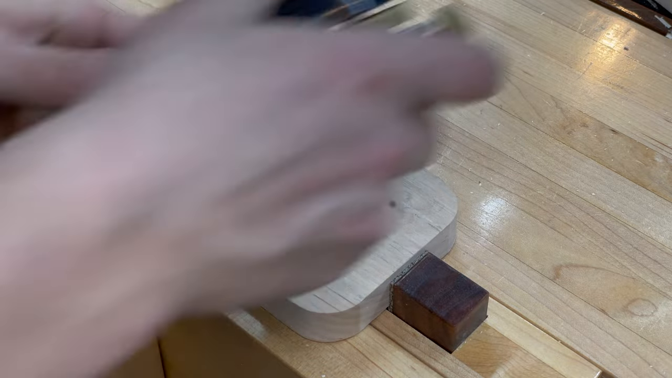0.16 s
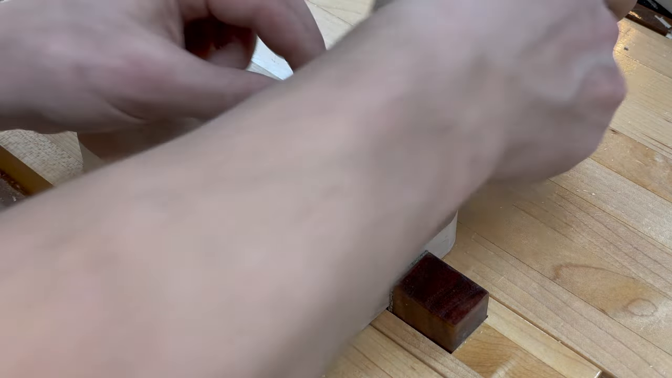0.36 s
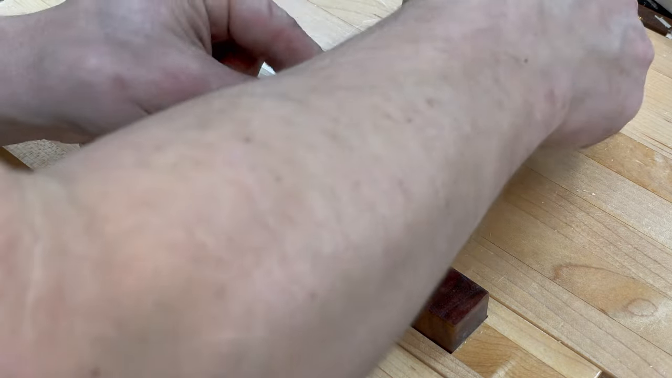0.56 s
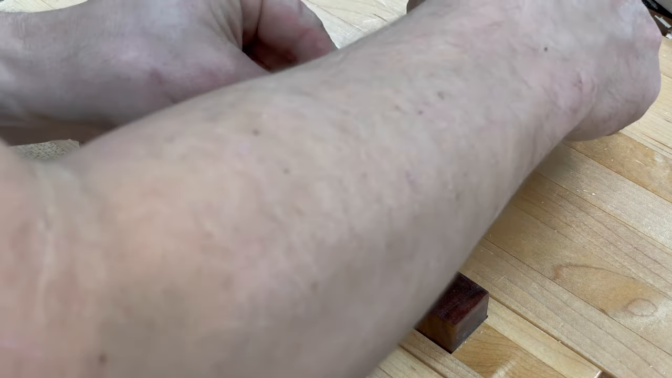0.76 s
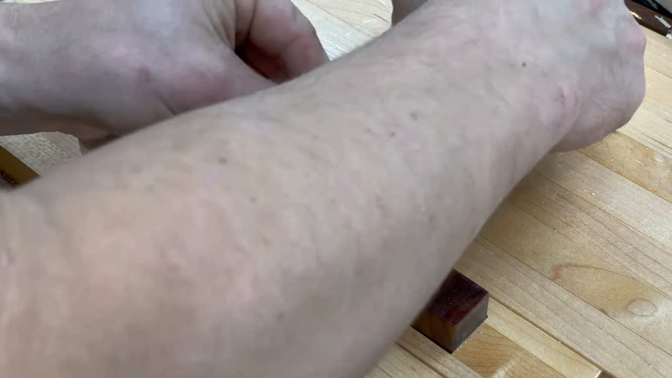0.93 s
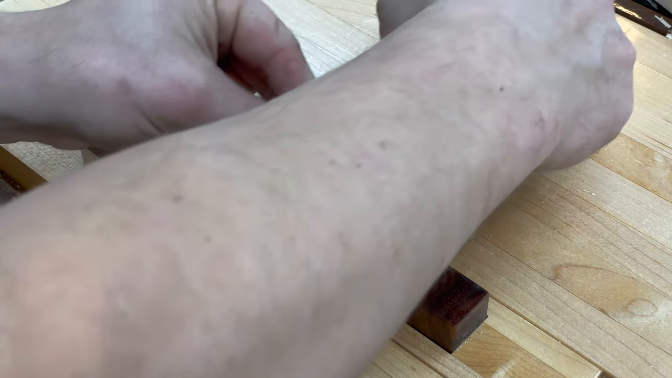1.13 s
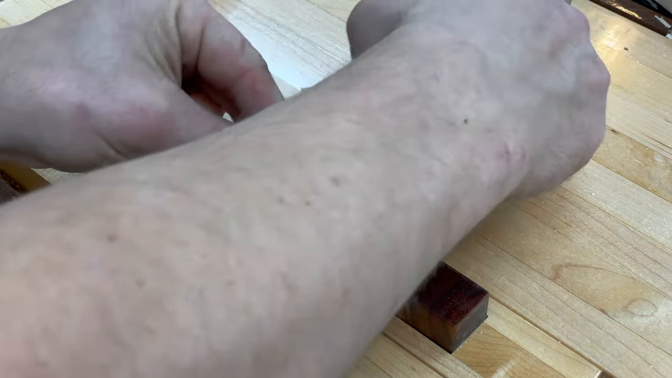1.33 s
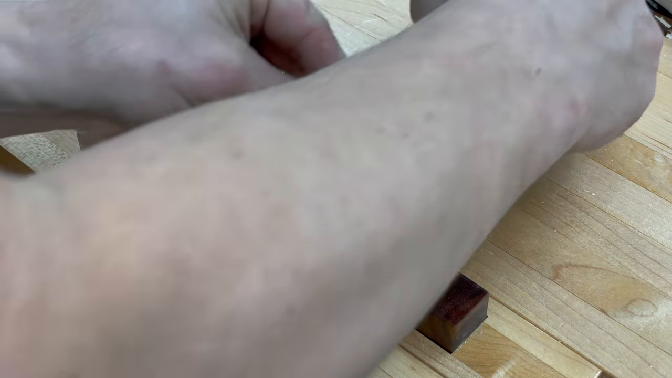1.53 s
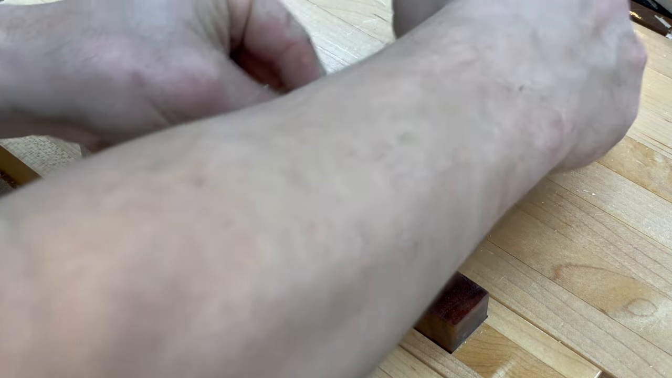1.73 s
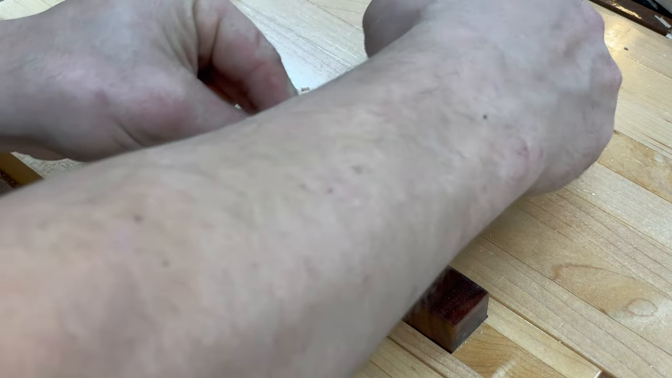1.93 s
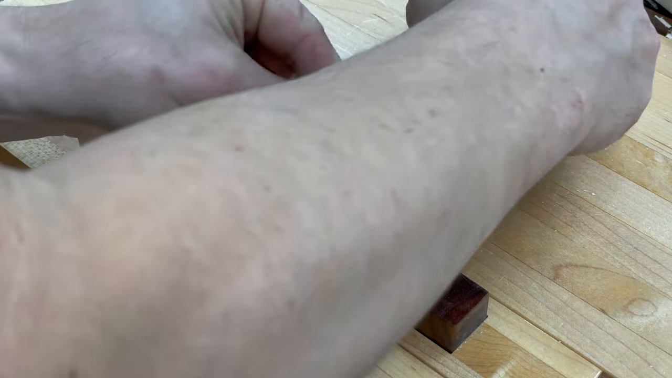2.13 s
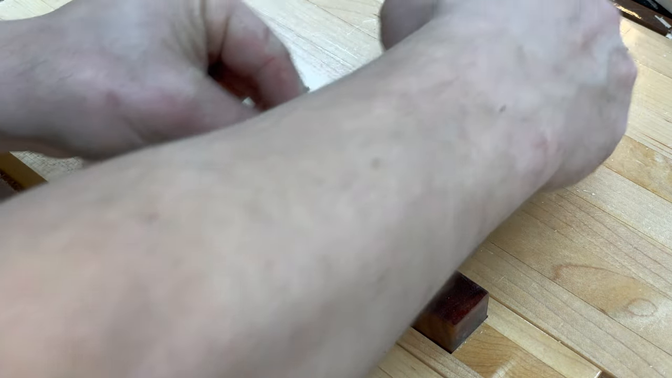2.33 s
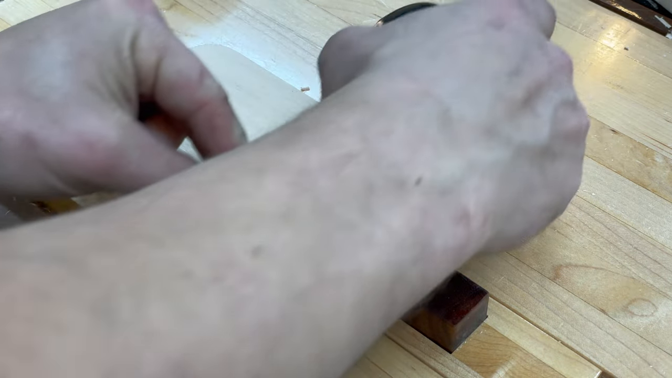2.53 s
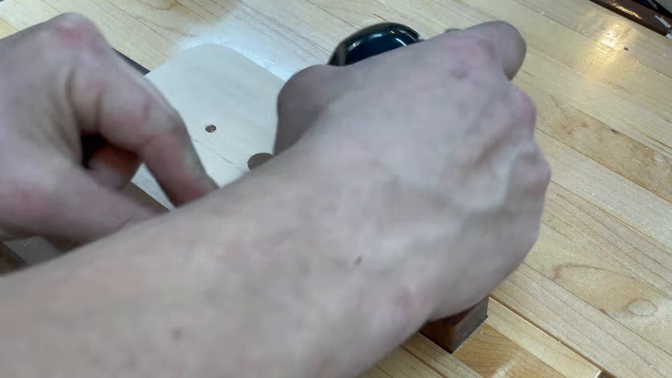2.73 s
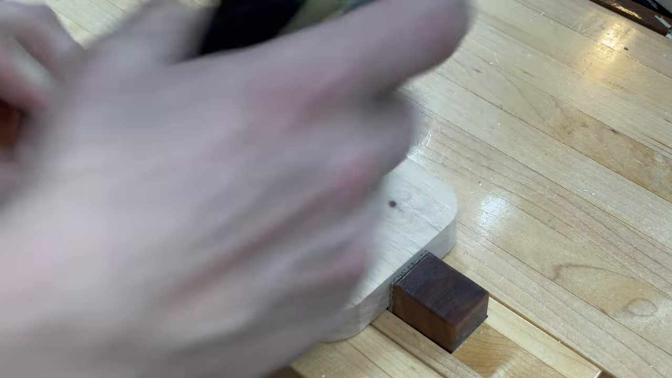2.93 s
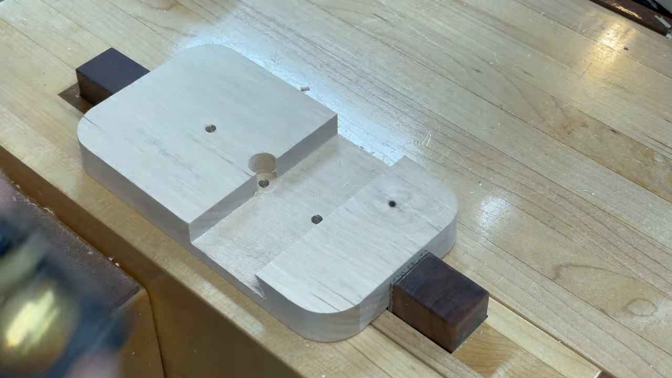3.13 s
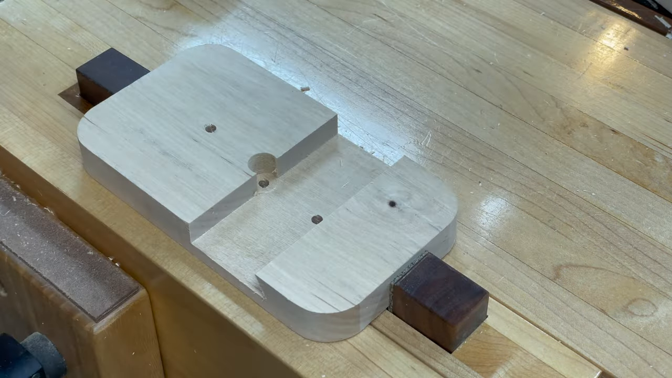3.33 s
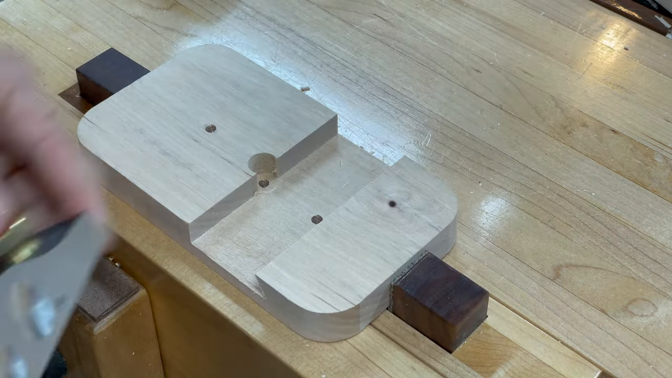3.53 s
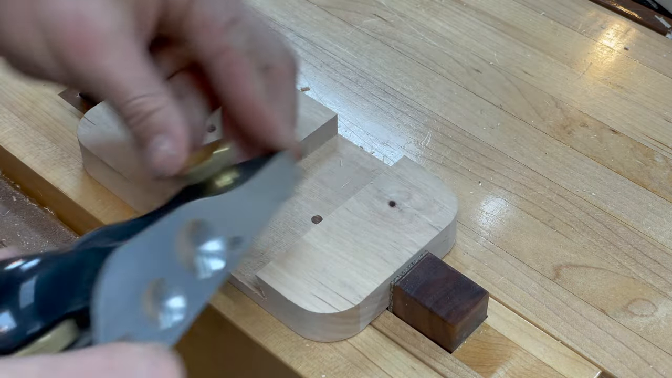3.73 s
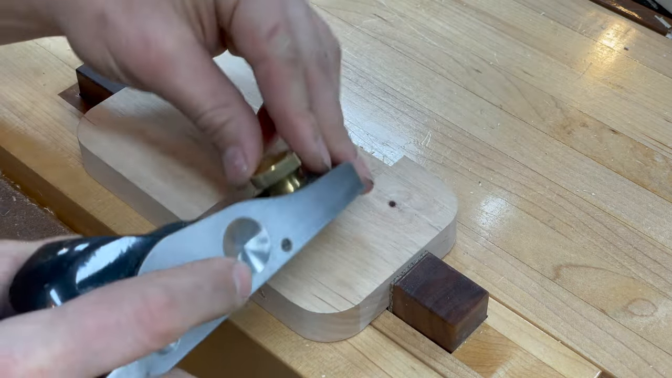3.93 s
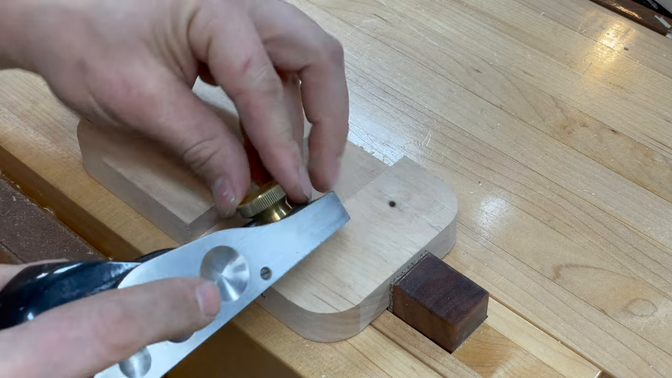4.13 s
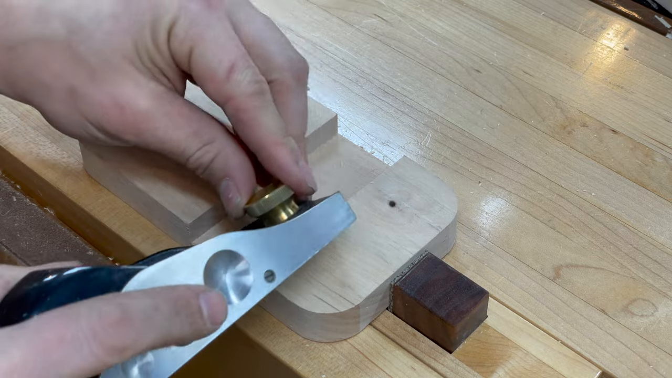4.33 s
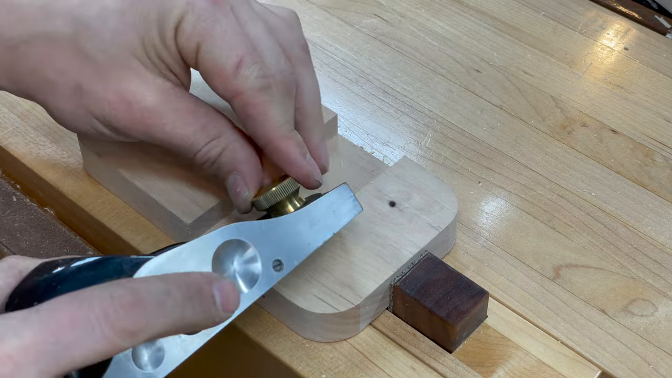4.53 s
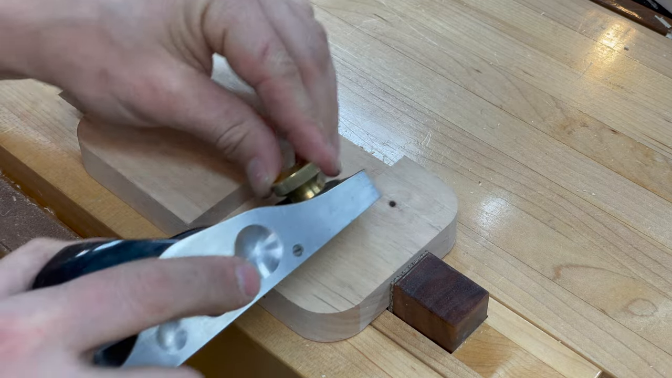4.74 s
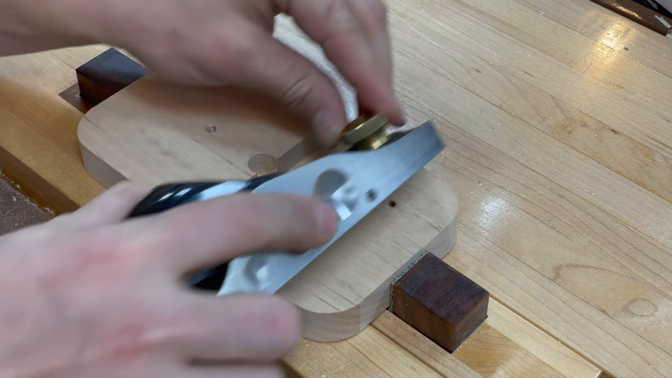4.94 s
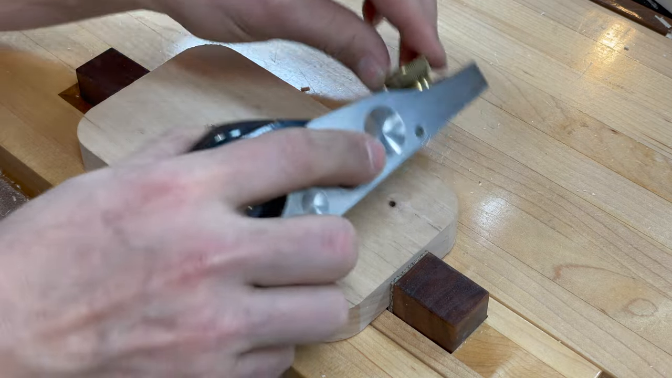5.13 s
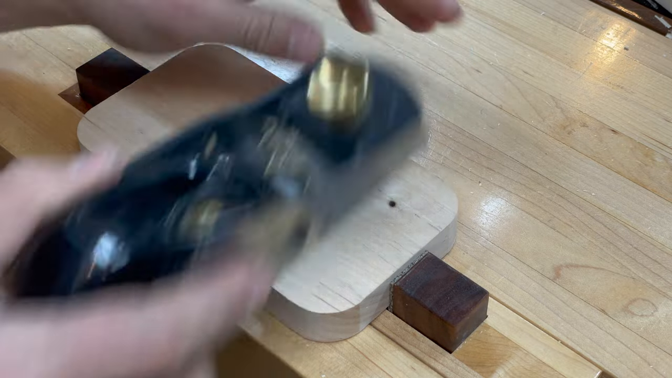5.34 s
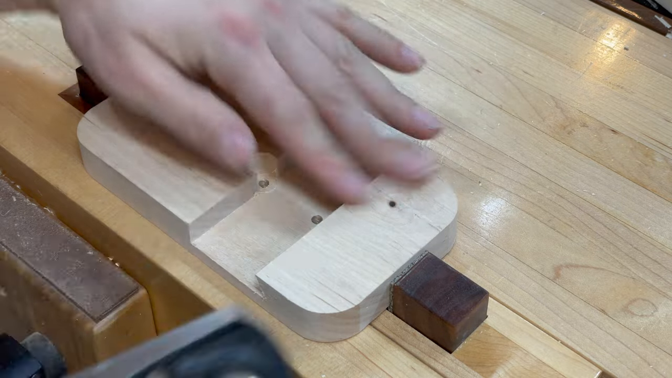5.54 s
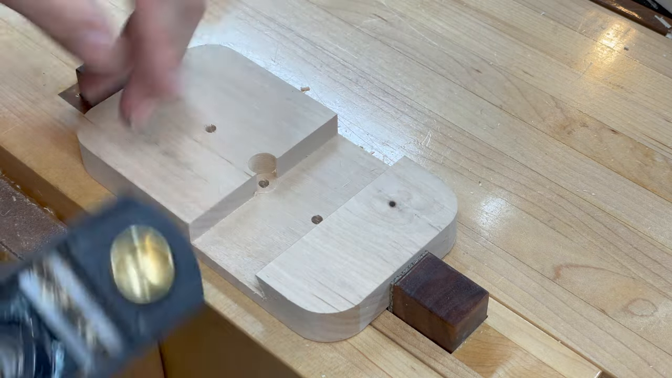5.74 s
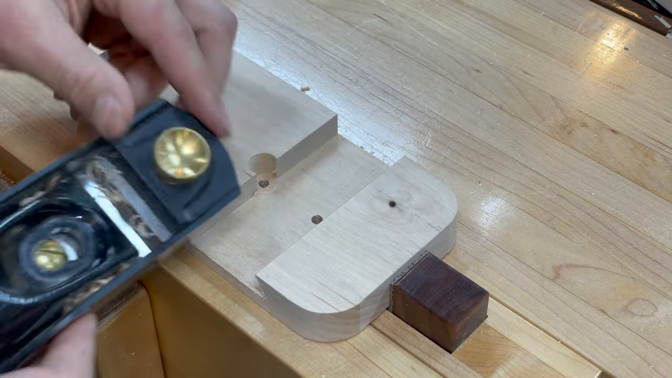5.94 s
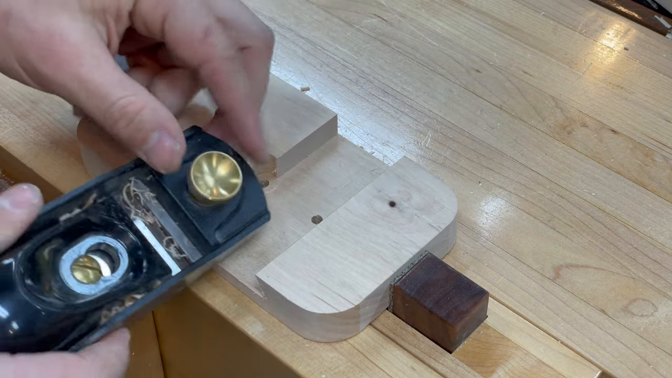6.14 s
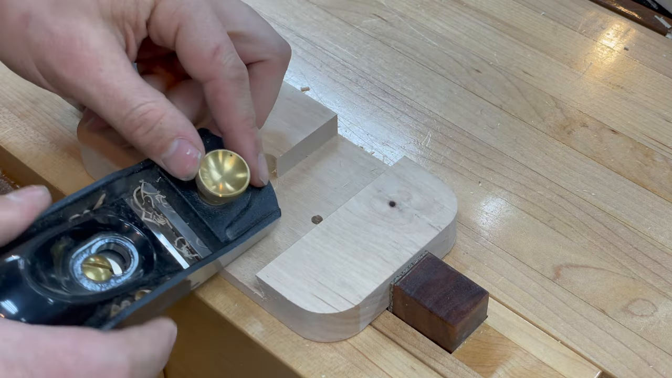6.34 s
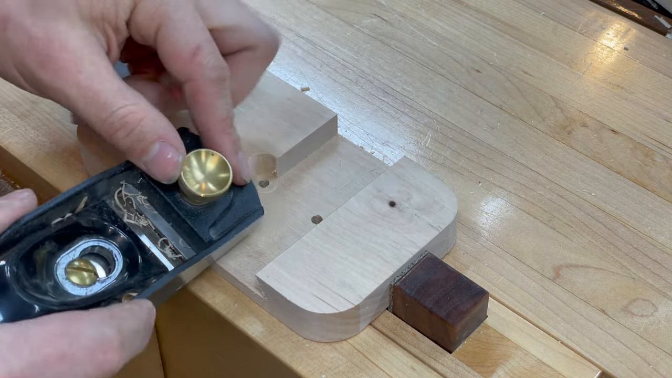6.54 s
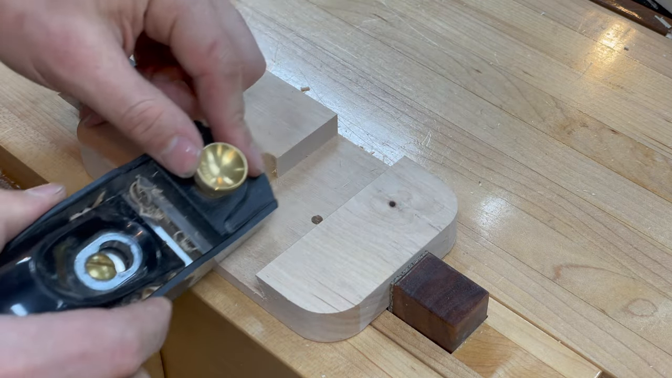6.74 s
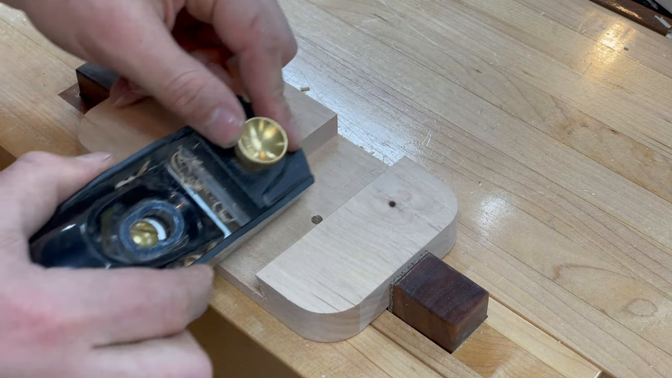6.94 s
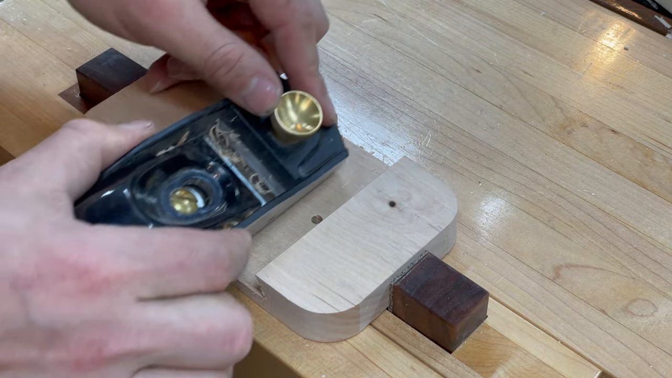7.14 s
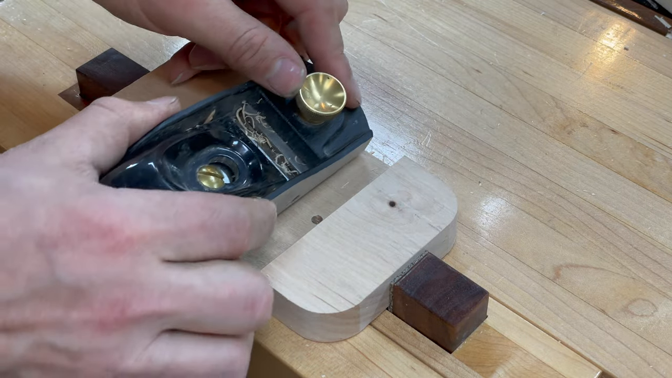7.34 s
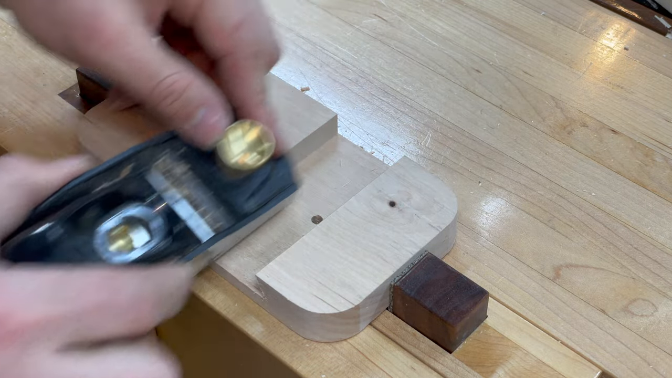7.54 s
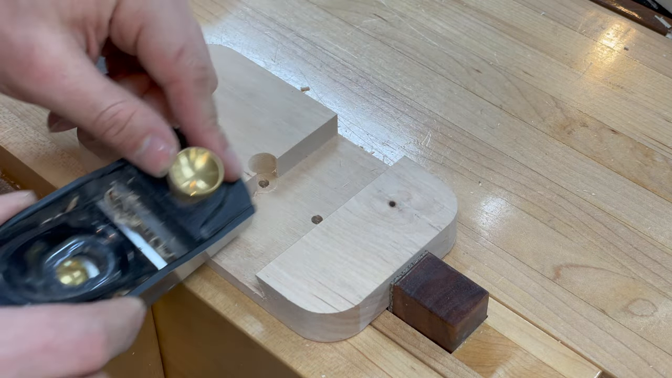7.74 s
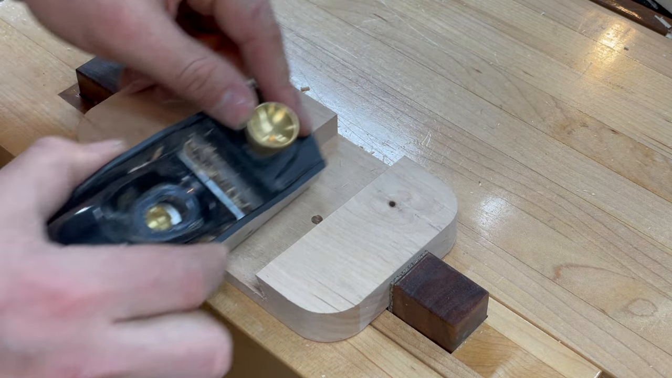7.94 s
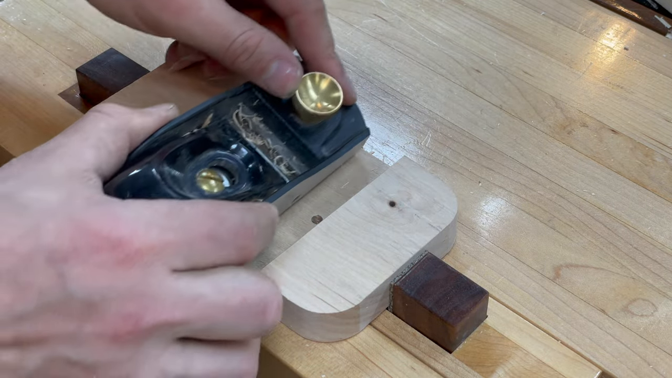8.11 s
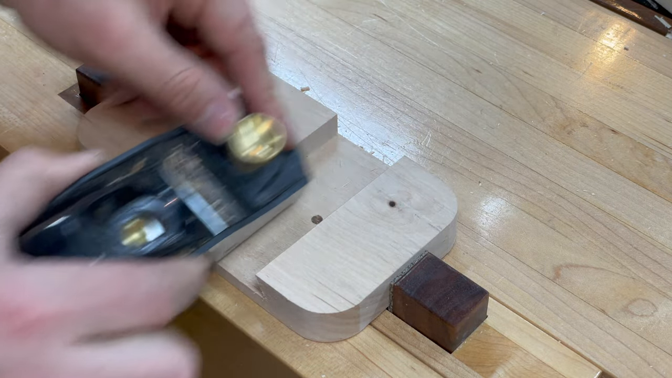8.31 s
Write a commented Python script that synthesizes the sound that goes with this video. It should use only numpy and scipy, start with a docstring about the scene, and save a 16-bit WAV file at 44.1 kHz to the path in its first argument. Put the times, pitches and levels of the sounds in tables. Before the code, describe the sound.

Close stereo sound in a quiet workshop, with a soft low ventilation rush and hum throughout and a short room echo. Hands brush lightly at the start, then a hollow wooden knock lands at 0.44 s and a softer one at 0.74. A plane stroke swells from 0.9 to 1.3 s, hissing and rasping, followed by a duller backward drag and a bump at 1.5. A short abrupt cut comes at 1.7, another drag at 1.95, and a longer fading cut from 2.25 to 2.7. Soft brushing fills 3.1-3.7 s. A firm wood-and-metal knock at 4.0 and a tiny scuff at 4.4 precede a louder, bright, hoarsely squeaking scrape at 4.6-5.1. Hands swish over wood at 5.5; a hard, sharp knock falls at 6.0. A lighter cut follows at 6.8-7.2, a droning drag at 7.5, a short strong cut at 7.83-8.03, then a final drag and knock around 8.3.

```python
"""Block plane on a board edge

A block plane chamfers the edges of a small board clamped on a workbench, in a quiet workshop.
Friction is made of random fibre snaps, coloured by spectra with the resonances of blade, sole and board.
Between the cuts the sole is dragged back; knocks ring decaying modes of bench, board and plane.
Scuffs, hoarse squeaks and brushing of hands and clothes are shaped noise, as are echoes and ventilation."""
import sys
import numpy as np
from scipy import signal
from scipy.fft import rfft, irfft
from scipy.io import wavfile

SR = 44100
rng = np.random.default_rng(int(sys.argv[2]) if len(sys.argv) > 2 else 0)


def to_wav(sig):
    """Store sig (one row per channel, or 1-D mono) as 16-bit WAV at the path in sys.argv[1].

    Samples outside -1..1 are clipped; the rate is SR.
    """
    pcm = np.clip(np.atleast_2d(sig), -1, 1) * 32767
    pcm = np.round(pcm).astype(np.int16)
    wavfile.write(sys.argv[1], SR, pcm.T)  # frames by channels


N = 369116
TIME = np.arange(N) / SR   # s
FREQS = np.maximum(np.arange(N // 2 + 1) * SR / N, 1)   # Hz

# All levels in the tables are relative: the layers that use them add gains of their own.
# forward cuts: start_s, length_s, attack_s, release_s, hiss_db (tearing fibres), rasp_db (plane),
# drone_db (board), easing_db (fall of the push along the stroke; negative: it grows)
CUTS = [(0.88, 0.46, 0.27, 0.11, -57.5, -53.5, -54.5, -2.5),
        (1.715, 0.18, 0.0035, 0.074, -50, -45, -51.5, -0.5),
        (2.25, 0.44, 0.0035, 0.011, -54.5, -48.5, -48, 6.5),
        (4.606, 0.48, 0.11, 0.0063, -47, -43.5, -46.5, -3.5),
        (6.808, 0.381, 0.016, 0.02, -58.5, -52.5, -55.5, -2.5),
        (7.83, 0.2, 0.0025, 0.014, -51, -44, -48, 2)]
# sole dragged without cutting: start_s, length_s, attack_s, hiss_db, rasp_db, drone_db,
# drone_rise_db (growth of the drone before the stop)
DRAGS = [(1.349, 0.161, 0.067, -56, -56.5, -50.5, 15), (1.942, 0.14, 0.044, -60.5, -51.5, -49, 11.5),
         (7.462, 0.122, 0.004, -54, -43, -46.5, 15.5), (8.247, 0.12, 0.031, -50, -40.5, -47, 36.5)]
# modes of the board and of the plane: pitch_hz, level_db, t60_s
BOARD = [(497.8, -5.5, 0.088), (612.5, -1, 0.078), (694, -7, 0.075), (751.5, -11, 0.11)]
PLANE = [(851, -16, 0.32), (934, -17, 0.19), (1023, -6, 0.034), (1073, -18.5, 0.039), (1291, -5.5, 0.047),
         (1364, -13, 0.09), (1533, -7.5, 0.054), (1750, -10.5, 0.046), (1850, -19.5, 0.14),
         (2253, -14.5, 0.068), (2990, -15.5, 0.022), (3780, -17.5, 0.013), (3850, -35, .22),
         (4480, -35.5, .04), (6360, -7.5, 0.0058)]
# resonances that friction excites in blade and sole: pitch_hz, width_hz, level_db (over the plain spectrum)
BLADE_PEAKS = [(4805, 117, 16), (5370, 940, 8.5), (6440, 190, 10.5), (10130, 120, 11), (12100, 700, 6)]
SOLE_PEAKS = [(1230, 210, 5.4), (1865, 69, 10.5), (2840, 400, 4.5), (2820, 190, 0.67), (3600, 160, 5.6)]
# spectrum of light rubbing: frequency_hz, density_db
BRUSH = [(200, 14), (600, 11.5), (950, 5.5), (1300, 6), (2000, 2), (3500, 5), (4300, 1), (5800, 2),
         (6900, 3.5), (8000, 4), (10500, -4.5), (13500, -8), (16000, -11)]


def cutting():
    """Brittle fracture: tearing fibres make a dense bright crackle, coloured by blade and sole resonances."""
    # spectra of the tearing fibres and of the plane: frequency_hz, density_db
    hiss_spectrum = [(1000, 0.5), (3000, -35), (4300, -0.5), (5800, 2), (7500, 6.5), (8500, 12),
                     (11000, -2), (14000, 3), (16000, -6)]
    rasp_spectrum = [(500, -10), (1000, 0.5), (1600, -4), (2250, -5.5), (3600, -2), (4300, -7), (8000, -45)]
    hiss = coloured(fibres(per_s=15000, spread_db=3.0), hiss_spectrum, BLADE_PEAKS)
    rasp = coloured(fibres(per_s=7000, spread_db=-2.0), rasp_spectrum, SOLE_PEAKS)
    gains = played(CUTS, cut_law, count=3)
    return sliding(gains, hiss, rasp, hiss_db=4.0, rasp_db=-3.0, drone_db=-0.5, rough_db=0.87, modal_db=-6)


def cut_law(t, length, attack, release, hiss_db, rasp_db, drone_db, easing_db):
    """Transient and steady friction: a loud first bite settles, then sound shifts from fibres to board."""
    bite_db, bite_s = 3, 0.16   # extra hiss at the start, and its time constant
    hiss_fade_db, drone_swell_db = 2, 4   # change from end to end of a cut
    along = t / length - .5   # -0.5 at the start, 0.5 at the end
    push = ramp(t, length, attack, release) * from_db(-easing_db * along)
    hiss = hiss_db + bite_db * np.exp(-t / bite_s) - hiss_fade_db * along
    drone = drone_db + drone_swell_db * along
    return push * from_db(np.broadcast_arrays(hiss, rasp_db, drone))


def dragging():
    """Sliding friction without fracture: the blade rides over the wood, duller, with the iron ringing through."""
    # spectra of the riding blade and of the sole: frequency_hz, density_db
    hiss_spectrum = [(3000, 5.5), (5000, -6), (7500, 2), (10000, -6), (16000, -22)]
    rasp_spectrum = [(500, -13), (1000, -17), (1700, -8), (2400, -7.5), (3300, -4.5), (3900, -13.5),
                     (8000, -51)]
    # resonances of the dragged sole: pitch_hz, width_hz, level_db (over the plain spectrum)
    drag_peaks = [(800, 130, 20), (1310, 54, 16.5), (1910, 24, 18.5), (2800, 140, -7), (2875, 73, 11)]
    hiss = coloured(fibres(per_s=29000, spread_db=-0.5), hiss_spectrum, BLADE_PEAKS)
    rasp = coloured(fibres(per_s=7000, spread_db=1.0), rasp_spectrum, drag_peaks)
    gains = played(DRAGS, drag_law, count=3)
    return sliding(gains, hiss, rasp, hiss_db=-1.8, rasp_db=-2.0, drone_db=-9.5, rough_db=0.7, modal_db=17.0)


def drag_law(t, length, attack, hiss_db, rasp_db, drone_db, drone_rise_db):
    """Growing structural response: hiss and rasp hold while the board's drone builds towards the stop."""
    rise_s, release_s = 0.083, 0.015
    rise = np.clip(1 - (length - release_s - t) / rise_s, 0, 1)
    levels_db = np.broadcast_arrays(hiss_db, rasp_db, drone_db + drone_rise_db * rise)
    return ramp(t, length, attack, release_s) * from_db(levels_db)


def sliding(gains, hiss, rasp, hiss_db, rasp_db, drone_db, rough_db, modal_db):
    """Forced vibration: friction hisses at the blade, rasps in the sole and sets the board droning."""
    # spectrum of the droning board: frequency_hz, density_db
    drone_spectrum = [(120, -28), (300, 1), (520, 4), (700, 9), (950, -4), (1300, -11), (1800, -8),
                      (4000, -71)]
    force = fibres(per_s=6000, spread_db=2.5)
    modal = rms_one(ring(force, BOARD) + from_db(-5.5) * ring(force, PLANE[:7]))
    broad = coloured(fibres(per_s=6000, spread_db=-0.4), drone_spectrum)
    drone = rms_one(broad + from_db(modal_db) * modal)
    parts = [from_db(hiss_db) * hiss, from_db(rasp_db) * rasp, from_db(drone_db) * drone]
    total = sum(part * gain for part, gain in zip(parts, gains))
    return grip(per_s=240, depth_db=rough_db) * total


def fibres(per_s, spread_db):
    """Shot noise: fibres snap at random; a positive spread makes a few much harder, a negative one weaker."""
    at = np.flatnonzero(rng.random(N) < per_s / SR)
    out = np.zeros(N)
    out[at] = rng.standard_normal(N)[at] * from_db(spread_db * np.minimum(rng.exponential(1, N)[at], 4))
    return out


def grip(per_s, depth_db):
    """Amplitude modulation: the contact tightens and eases at random with the grain of the wood."""
    steps = rng.standard_normal(N)
    return rms_one(from_db(depth_db * np.interp(TIME * per_s, np.arange(N), steps)))


def gliding():
    """Light sliding contact: the sole's force grows exponentially into each stroke and decays after it."""
    level_vs_rasp_db, rise_db_per_s, fall_db_per_s = -16.5, 181, 158
    strokes = [(start + attack, start + length - release, rasp_db)
               for start, length, attack, release, _, rasp_db, _, _ in CUTS]
    strokes += [(start + attack, start + length, rasp_db)
                for start, length, attack, _, rasp_db, _, _ in DRAGS]
    level_db = np.full(N, -np.inf)
    for start, end, rasp_db in strokes:
        before_db = rise_db_per_s * np.maximum(start - TIME, 0)
        after_db = fall_db_per_s * np.maximum(TIME - end, 0)
        level_db = np.maximum(level_db, rasp_db - before_db - after_db)   # the nearest strong stroke wins
    return from_db(level_db + level_vs_rasp_db)


def knocks(crack_db, crack_low_hz, crack_high_hz, thud_db, thud_t60, clatter_db, clatter_t60):
    """Impact excitation: a blow cracks and rings bench, board and plane; a soft contact lacks treble."""
    # blows: start_s, board_db, lowest_db (the board's lowest mode over its others), bench_db, plane_db,
    # contact_hz (hardness of the contact, as a low-pass corner)
    blows = [(0.171, -60, 15.5, -64, -40.5, 2500), (0.372, -39.5, 10.5, -45.5, -60, 2000),
             (0.437, -13, -1.5, -25.5, -29.5, 1480), (0.736, -36, -9, -56, -52, 900),
             (0.7409, -27, -11, -29.5, -32, 1090), (1.49, -22.5, -2.5, -56, -40.5, 1300),
             (2.085, -43, -2, -44, -67, 1300), (4.0241, -15.5, -2.5, -30, -17.5, 3200),
             (5.476, -46.5, 19, -45.5, -69, 1490), (5.9882, -16, 5, -33, -13.5, 6900),
             (7.568, -40, -10, -40, -47, 800), (8.2508, -43, -7, -61, -43, 2040),
             (8.352, -20.5, -7, -51, -27.5, 1700)]
    # modes of the bench: pitch_hz, level_db, t60_s
    bench_modes = [(114.8, -26.5, .35), (202, -16.5, 0.5), (248, -9, 0.16), (315.4, -6, 0.17),
                   (387, 0.5, 0.058), (458, -0.5, 0.15)]
    # the many short-lived modes of wood and iron between the clear ones: frequency_hz, density_db
    thud_spectrum = [(80, -17), (200, -20), (380, 2), (700, 9), (950, -10), (1400, -43), (3000, -24.5),
                     (6000, -25.5), (9000, -37), (16000, -58.5)]
    clatter_spectrum = [(300, -17.5), (900, 1), (1500, 3.5), (2700, -20), (3600, -5.5), (4100, -15.5),
                        (4700, -7.5), (5800, -19), (6700, -30.5), (7800, -21), (16000, -52.5)]
    out, click = np.zeros(N + SR), signal.unit_impulse(SR)
    crack_band = signal.butter(2, [crack_low_hz, crack_high_hz], "band", fs=SR, output="sos")
    crack = signal.sosfilt(crack_band, click)
    lowest, upper = ring(click, BOARD[:1]), ring(click, BOARD[1:])
    bench, plane = ring(click, bench_modes), ring(click, PLANE)
    for start_s, board_db, lowest_db, bench_db, plane_db, contact_hz in blows:
        wood = from_db(lowest_db) * lowest - upper + from_db(thud_db) * burst(thud_spectrum, thud_t60)
        clatter = from_db(clatter_db) * burst(clatter_spectrum, clatter_t60)
        iron = plane + from_db(crack_db) * crack + clatter
        blow = from_db(board_db) * wood + from_db(bench_db) * bench + from_db(plane_db) * iron
        start = round(start_s * SR)
        contact = signal.butter(1, min(contact_hz, SR / 3), fs=SR)
        out[start:start + SR] += signal.lfilter(*contact, blow)
    return out[:N]


def ring(force, modes):
    """Modal superposition: each mode answers a click with a dying sine; neighbours have opposite signs."""
    out = 0
    for k, (hz, db, t60) in enumerate(modes):
        radius = np.exp(-np.log(1000) / (t60 * SR))   # decay per sample
        angle = 2 * np.pi * hz / SR
        poles = [1, -2 * radius * np.cos(angle), radius * radius]
        sine = signal.lfilter([np.sin(angle)], poles, force + 1e-18)   # the offset avoids slow tiny numbers
        out = out + (-1) ** k * from_db(db) * sine
    return out


def burst(spectrum, t60):
    """High modal density: crowded modes struck together are a second of noise that dies away."""
    gain = from_db(at_hz(spectrum, np.arange(SR // 2 + 1) + 1))
    noise = irfft(rfft(rng.standard_normal(SR)) * gain, SR)
    return rms_one(noise) * np.exp(-np.log(1000) * TIME[:SR] / t60)


def squeaks(width_hz):
    """Resonance under random drive: uneven slips excite a narrow band, a hoarse tone that swells and fades."""
    # rubbing that catches one resonance: centre_s, length_s, pitch_hz, level_db
    rubs = [(0.13, 0.24, 1240, -56), (1.093, 0.26, 5650, -61), (1.101, 0.24, 3600, -68),
            (1.47, 0.042, 3040, -57), (1.79, 0.091, 3140, -48.5), (2.425, 0.19, 5000, -52.5),
            (3.216, 0.17, 1300, -62), (3.488, 0.02, 6450, -51), (3.54, 0.18, 2330, -61),
            (4.738, 0.14, 6450, -42.5), (4.847, 0.26, 5160, -46), (5.544, 0.054, 5100, -56.5),
            (6.399, 0.039, 5770, -70.5), (7.513, 0.06, 2870, -50), (7.555, 0.13, 860, -42),
            (8.293, 0.07, 2690, -45)]
    out = np.zeros(N + SR)
    for centre_s, length, hz, db in rubs:
        peak = signal.iirpeak(hz, hz / width_hz, fs=SR)
        tone = signal.lfilter(*peak, signal.lfilter(*peak, rng.standard_normal(SR)))
        start = max(round((centre_s - .5) * SR), 0)
        swell = np.exp(-(2 * (TIME[:SR] + start / SR - centre_s) / length) ** 2)
        out[start:start + SR] += from_db(db) * rms_one(tone) * swell
    return out[:N]


def scuffs():
    """Transient friction: the blade catches the wood for an instant, a bell-shaped swell of fibre snaps."""
    # catches of the blade: centre_s, length_s, level_db
    catches = [(0.173, 0.0023, -47), (0.378, 0.02, -61), (4.417, 0.082, -60.5), (4.445, 0.015, -44.5),
               (4.6, 0.0026, -59), (4.61, 0.0024, -60), (5.412, .004, -64), (5.472, 0.015, -57.5),
               (7.325, 0.023, -56), (8.12, 0.011, -56.5)]
    swell = sum(from_db(db) * np.exp(-(2 * (TIME - centre_s) / length) ** 2)
                for centre_s, length, db in catches)
    return swell * coloured(fibres(per_s=27000, spread_db=4.0), BRUSH, SOLE_PEAKS)


def brushing(sizzle_db, sizzle_hz, firm_db):
    """Soft friction: skin, cloth and the gliding sole swish, and sound brighter as they press harder."""
    # movements of hands and clothes: start_s, length_s, attack_s, release_s, level_db, sizzle_db
    movements = [(-0.01, 0.3, 0.0083, 0.28, -51.5, 5), (0.62, 0.16, 0.12, 0.04, -66, 0),
                 (2.93, 0.17, 0.028, 0.02, -75.5, -6), (3.095, 0.23, 0.024, 0.073, -63.5, -16),
                 (3.365, 0.32, 0.077, 0.13, -52, 5), (3.67, 0.13, 0.016, 0.063, -71.5, -4),
                 (5.49, 0.13, 0.048, 0.091, -55.5, 10.5), (6.44, 0.097, 0.046, 0.05, -73, -12.5),
                 (6.62, 0.19, 0.04, 0.02, -75.5, -2)]
    force, bright = played(movements, brush_law, count=2) + gliding()
    highpass = signal.butter(2, min(sizzle_hz, SR / 3), "high", fs=SR, output="sos")
    sizzle = rms_one(signal.sosfilt(highpass, fibres(per_s=35000, spread_db=-2.5)))
    swish = from_db(3.5) * coloured(rng.standard_normal(N), BRUSH) * force
    firmness = np.sqrt(force / from_db(firm_db))
    return (swish + from_db(sizzle_db) * sizzle * bright * firmness) * grip(per_s=82, depth_db=1.6)


def brush_law(t, length, attack, release, db, sizzle_db):
    """Common envelope: swish and sizzle gains swell, hold and fade together with one movement."""
    return from_db([[db], [db + sizzle_db]]) * ramp(t, length, attack, release)


def played(rows, law, count):
    """Superposition of movements: each row adds its gains to count layers, shaped by the same law."""
    out = np.zeros((count, N))
    for start_s, length, *rest in rows:
        on = (TIME >= start_s) & (TIME < start_s + length)
        out[:, on] += law(TIME[on] - start_s, length, *rest)
    return out


def ramp(t, length, attack, release):
    """Linear envelope: attack, hold and release of one movement of the hand."""
    return np.clip(t / attack, 0, 1) * np.clip((length - t) / release, 0, 1)


def shimmer(x, echo_db, delay_s, wander_s, per_s):
    """Comb filtering: a near echo from bench and hands shifts at random, so bright bands come and go."""
    delay = delay_s + wander_s * np.interp(TIME * per_s, np.arange(SR), rng.standard_normal(SR))
    echo = from_db(echo_db)
    return (x + echo * np.interp(TIME - delay, TIME, x)) / np.hypot(1, echo)


def reflections(early_db, early_s, late_db):
    """Room impulse response: a quick cluster from bench and arms, then a diffuse tail dying by band."""
    # reverberation of the workshop: frequency_hz, t60_s
    room_t60 = [(100, 0.45), (500, 0.57), (1500, 0.45), (4000, 0.4), (8000, 0.29), (16000, 0.078)]
    t, edges = TIME[:SR], np.geomspace(60, 17000, 10)
    tail = 0
    for low, high in zip(edges, edges[1:]):
        bandpass = signal.butter(2, [low, high], "band", fs=SR, output="sos")
        band = signal.sosfilt(bandpass, rng.standard_normal(SR))
        tail = tail + band * np.exp(-np.log(1000) * t / at_hz(room_t60, np.sqrt(low * high)))
    early = rng.standard_normal(SR) * np.exp(-t / early_s) * (t > .002)
    late = tail * (t > .008)
    return (from_db(early_db) * rms_one(early) + from_db(late_db) * rms_one(late)) / np.sqrt(SR)


def spread(mid, side):
    """Mid-side stereo: the microphones hear diffuse sound wider in some bands than in others."""
    # width of diffuse sound: frequency_hz, side_db
    width = [(60, -16.5), (330, -4.5), (800, 2), (1400, -4.5), (2000, -29), (3200, -14.5), (5000, -10.5),
             (7600, -3.5), (8800, -29.5), (10200, 1.5), (11800, 3.5), (13200, -17)]
    side = irfft(rfft(side) * from_db(at_hz(width, FREQS)), N)
    return np.array([mid + side, mid - side])


def workshop_air(air_db):
    """Broadband and narrow-band noise: the dull rush and the wavering hum of the ventilation."""
    # spectrum of the rush: frequency_hz, density_db
    air_spectrum = [(20, -30), (40, -7.5), (62, 0), (85, -4.5), (120, -8.5), (220, -4), (330, -4.5),
                    (480, -6), (700, -12.5), (1300, -17.5), (2000, -22), (3200, -31.5), (5000, -45.5),
                    (16000, -49.5)]
    # bands of the hum: pitch_hz, width_hz, level_db
    hum_bands = [(62.6, 25, -75), (115.3, 12, -61), (165.2, 16.3, -59.5), (216.7, 10, -65.5),
                 (270.4, 9.1, -65.5)]
    power = sum((from_db(db) * rms_one(resonance(hz, width) ** 2)) ** 2 for hz, width, db in hum_bands)
    hum = irfft(rfft(rng.standard_normal(N)) * np.sqrt(power), N)
    return from_db(air_db) * coloured(rng.standard_normal(N), air_spectrum) + hum


def coloured(x, spectrum, peaks=()):
    """Linear filtering: a broad spectrum with resonances standing on it, scaled to an rms of 1."""
    power = 1 + sum((from_db(db) * resonance(hz, width)) ** 2 for hz, width, db in peaks)
    return rms_one(irfft(rfft(x) * from_db(at_hz(spectrum, FREQS)) * np.sqrt(power), N))


def resonance(hz, width):
    """Damped oscillator: magnitude response of one resonance, 1 on top."""
    return 1 / np.hypot(1, (FREQS ** 2 - hz ** 2) / (FREQS * width))


def at_hz(points, hz):
    """Logarithmic frequency scale: read a table between its points."""
    table = np.array(points)
    return np.interp(np.log(hz), np.log(table[:, 0]), table[:, 1])


def from_db(db):
    """Logarithmic level scale: decibels to amplitude gain."""
    return 10 ** (np.asarray(db) / 20)


def rms_one(x):
    """Normalised mean power: scale to an rms of 1."""
    return x / np.sqrt(np.mean(x ** 2) + 1e-20)


def scene():
    """Direct and diffuse fields: the work sounds from one central spot, with echoes and air to both sides."""
    blows = knocks(crack_db=23.5, crack_low_hz=763, crack_high_hz=2550,
                   thud_db=-7.5, thud_t60=0.11, clatter_db=2.5, clatter_t60=0.015)
    friction = cutting() + dragging() + brushing(sizzle_db=-2.5, sizzle_hz=10000, firm_db=-46.5)
    friction = shimmer(friction, echo_db=-17, delay_s=0.0019, wander_s=0.00009, per_s=11)
    work = friction + blows + scuffs() + squeaks(width_hz=320)
    echo_mid, echo_side = [
        signal.fftconvolve(work, reflections(early_db=-10, early_s=0.011, late_db=-14.0))[:N]
        for _ in range(2)]
    air_mid, air_side = [workshop_air(air_db=-55) for _ in range(2)]
    return spread(work + echo_mid + air_mid, from_db(-0.5) * echo_side + from_db(-1.5) * air_side)


def record(dry):
    """Phase lag and band limits: the left port lags in frequency bands; deep bass and top are cut."""
    # lag of the left port: frequency_hz, lag_rad
    port_lag = [(100, 0), (2200, 0), (3500, -.6), (5200, -.5), (5750, 1.5), (6900, .8), (7600, 2.3),
                (8500, 3.1), (9300, 3.2), (12900, 6.28)]
    left = irfft(rfft(dry[0]) * np.exp(-1j * at_hz(port_lag, FREQS)), N)
    highpass = signal.butter(2, 33, "high", fs=SR, output="sos")
    lowpass = signal.ellip(10, .1, 90, 15600, fs=SR, output="sos")   # steep cut above 15600 Hz
    heard = signal.sosfilt(highpass, np.array([left, dry[1]]))
    return signal.sosfilt(lowpass, heard)


dry = scene()
out = record(dry)
to_wav(out)
```